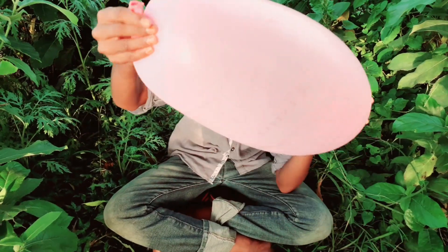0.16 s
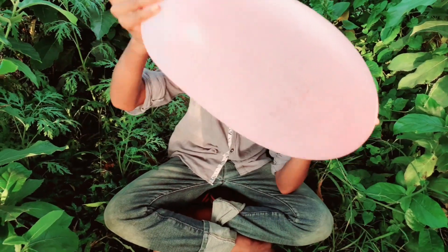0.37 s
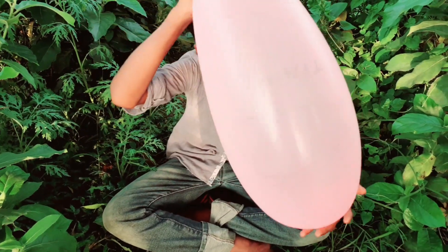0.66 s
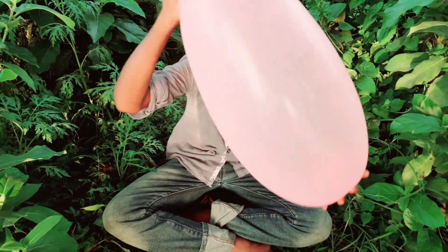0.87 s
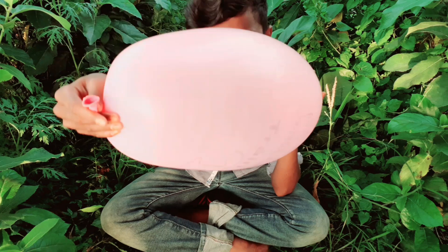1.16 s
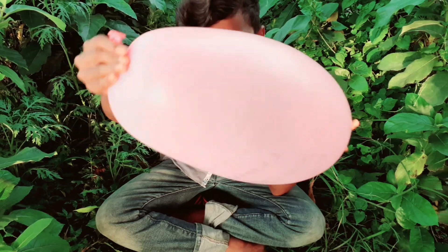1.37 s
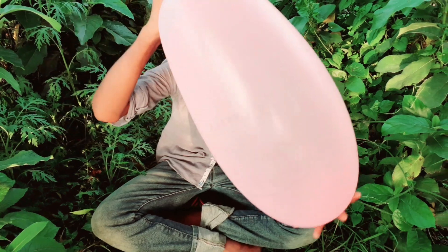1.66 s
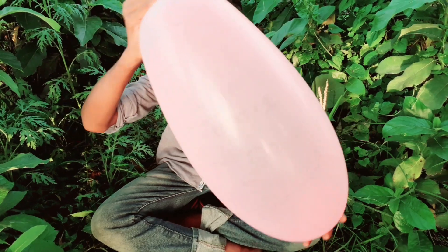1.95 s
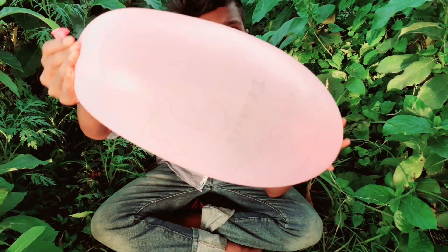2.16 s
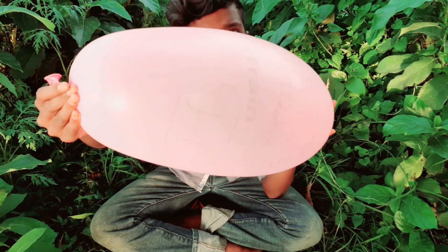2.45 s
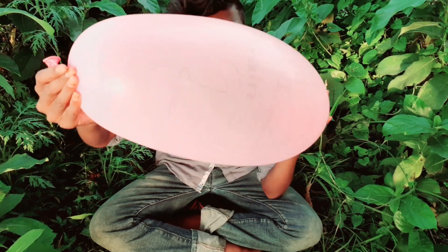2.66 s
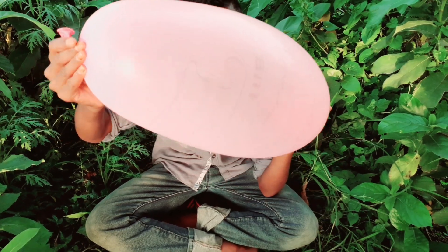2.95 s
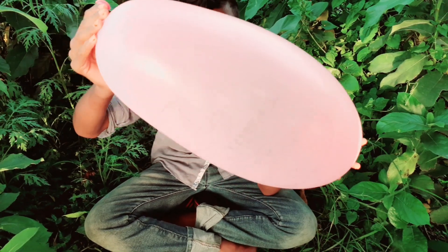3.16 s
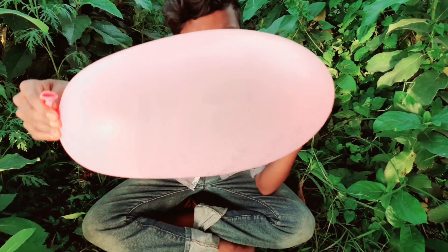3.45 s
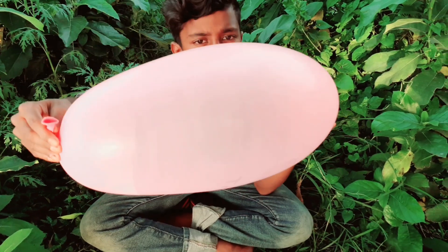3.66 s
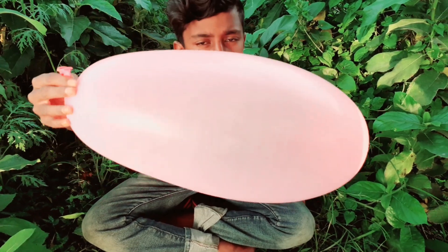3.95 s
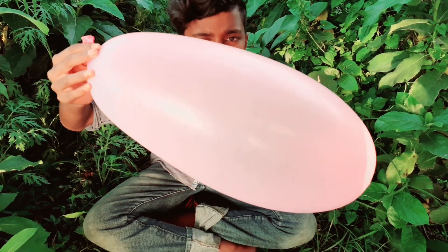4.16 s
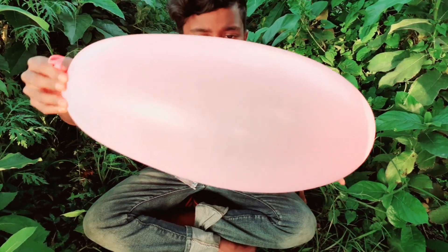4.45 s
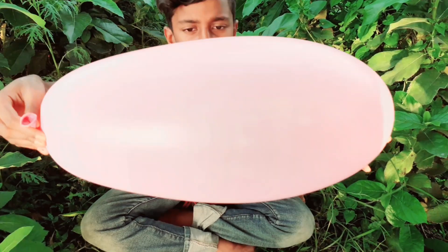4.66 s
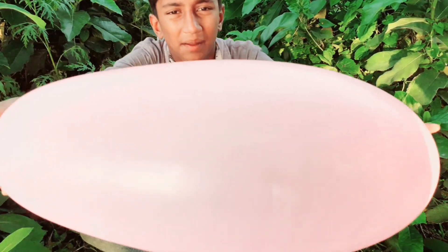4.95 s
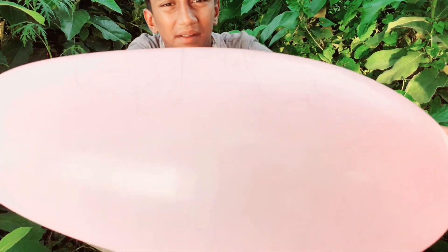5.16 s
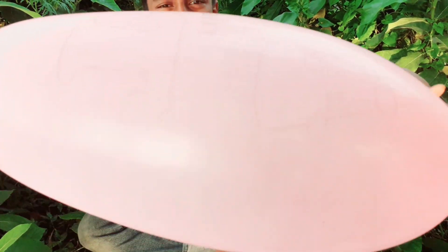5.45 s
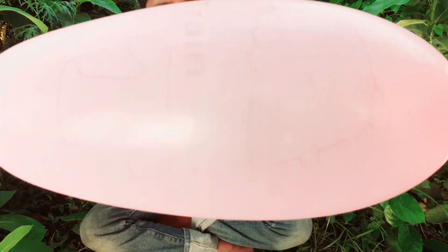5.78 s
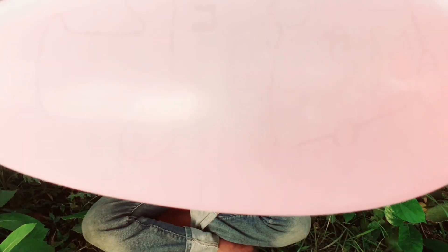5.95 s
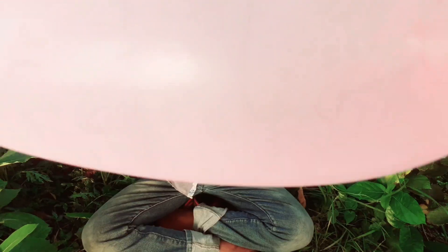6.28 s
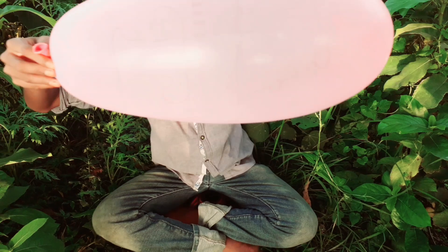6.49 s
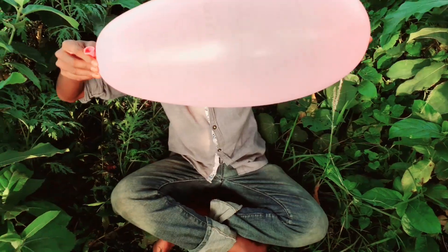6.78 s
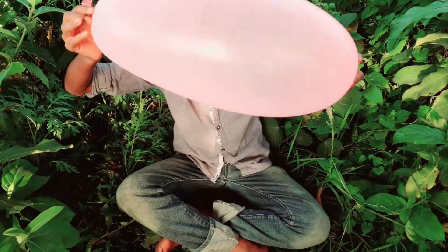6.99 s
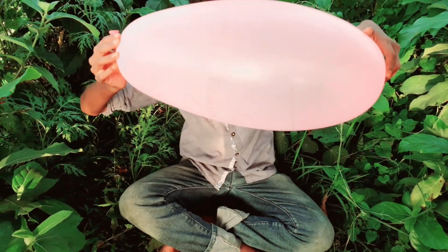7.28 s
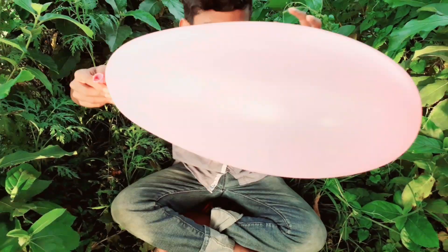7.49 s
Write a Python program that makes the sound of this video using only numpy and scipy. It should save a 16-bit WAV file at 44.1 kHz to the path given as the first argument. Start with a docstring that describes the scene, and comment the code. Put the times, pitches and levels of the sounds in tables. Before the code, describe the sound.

Hands rub and squeeze a big latex balloon up close, squeaky rasping strokes with hollow thuds growing softer while a bird chirps in a leafy garden.

```python
"""Rubbing a balloon in a garden

Two hands rub and squeeze a long latex balloon in a leafy garden, close to a small stereo microphone.
The skin sticks and slips: each slip shakes the resonances of the rubber and of the enclosed air.
Filtered noise makes leaves hiss and puffs of wind buffet the two ports (microphone openings).
Gliding sines make one bird's repeated two-part chirp and other whistles, with short echoes.
All table levels are relative: filters and mixing come after them."""
import sys
import numpy as np
from scipy import signal
from scipy.fft import rfft, irfft, next_fast_len
from scipy.io import wavfile
from scipy.ndimage import map_coordinates

SR = 44100
rng = np.random.default_rng(int(sys.argv[2]) if len(sys.argv) > 2 else 0)


def master(y):
    """Save y as 16-bit WAV."""
    cut = np.clip(np.atleast_2d(y).T, -1, 1)
    pcm = np.round(cut * 32767)  # scale
    wavfile.write(sys.argv[1], SR, pcm.astype(np.int16))


N = 336042  # length [samples]


def amp(db):
    """Turn decibels into a gain."""
    return 10 ** (np.asarray(db) / 20)


def unit(x):
    """Scale a sound to an rms of 1."""
    return x / np.sqrt(np.mean(x ** 2) + 1e-20)


def ramp(x):
    """Keep x where it is positive, else 0."""
    return np.maximum(x, 0)


def along(points, hz):
    """Read a (frequency, value) table between its points, on a log frequency axis."""
    f, value = np.transpose(points)
    return np.interp(np.log(hz + 1), np.log(f + 1), value)


def curves(rows, t=None):
    """Join the rows into one smooth line of samples for each column after the time."""
    times, *columns = np.transpose(rows)
    if t is None:
        t = np.arange(N) / SR
    return [np.interp(t, times, column) for column in columns]


def wobble(rate):
    """Draw a smooth random curve with this many random knots a second."""
    knots = rng.standard_normal(int(N * rate / SR) + 4)
    return map_coordinates(knots, [np.arange(N) * rate / SR])


def apart(share):
    """Make noise common to both ports, plus a share that each port hears alone."""
    return rng.standard_normal(N) + share * rng.standard_normal((2, N))


def filtered(x, response):
    """Multiply the spectrum of x by a response to frequency."""
    size = next_fast_len(N + SR // 2)
    hz = np.fft.rfftfreq(size, 1 / SR)
    return irfft(rfft(x, size) * response(hz), size)[..., :N]


def modes(table, wider=1, sign=-1):
    """Sum resonances (frequency, width, level); with sign 1 they all start together."""
    def response(hz):
        total = 0
        for k, (center, width, db) in enumerate(table):
            damping = 1j * hz * width * wider
            total = total + sign ** k * amp(db) * damping / (center * center - hz * hz + damping)
        return total
    return response


def dull(corner_hz):
    """Let rubber damp the top of its ring."""
    return lambda hz: 1 / (1 + 1j * hz / corner_hz) ** 2


def treble(hz):
    """Pass the fine dry rustle of the surface and weaken what lies below it."""
    ratio = (hz / 7000) ** 2
    return ratio / (1 + ratio)


def placed(times, db):
    """Put one pulse at each time."""
    return np.bincount(np.round(times * SR).astype(int), amp(db), N)


def dying(pulses, t60):
    """Make each pulse jump up and die away by 60 dB in t60 seconds."""
    return signal.lfilter([1], [1, -amp(-60 / (t60 * SR))], pulses)


def tone(rows, waver):
    """Sing a sine along (time, pitch, level) rows, silent outside them; its pitch wavers quickly."""
    hz, db = curves(rows)
    t = np.arange(N) / SR
    phase = 2 * np.pi * np.cumsum(hz * (1 + waver * wobble(150))) / SR
    inside = (t > rows[0][0]) * (t < rows[-1][0])
    return amp(db) * np.sin(phase) * inside


def layered(db, rest_db):
    """Add the powers of overlapping events to a resting level: a row per event, a column per ms."""
    total_db = 10 * np.log10(np.sum(amp(db) ** 2, axis=0) + amp(rest_db) ** 2)
    return np.interp(np.arange(N) * 1000 / SR, np.arange(len(total_db)), total_db)


# Tone colour of the leaves: (frequency [Hz], level [dB])
LEAF_COLOUR = [(180, -14.5), (300, 5.5), (582, -14.5), (800, -9), (3270, -14.5), (5560, -10.5),
               (8140, -19.5), (12700, -22), (15800, -21)]


def leaves():
    """Leaves hiss: coloured noise, different at each port, gently swells and fades."""
    hiss = unit(filtered(rng.standard_normal((2, N)), lambda hz: amp(along(LEAF_COLOUR, hz))))
    return amp(-56.0 + 1.72 * wobble(2.034)) * hiss


# Puffs of air: (start [s], length [s], left port level [dB], right port above the left [dB])
GUST_TIMES = [(1.033, 0.18, -36.5, -0.5), (1.555, 0.29, -42.5, 5), (2.652, 0.1898, -36, -12.5),
              (2.896, 0.098, -41.5, -16), (3.404, 0.149, -43.0, -10), (3.656, 0.12, -34.5, -22),
              (3.832, 0.182, -30.5, -19), (5.117, 0.0955, -39, -7.5), (5.625, 0.0449, -36, -6.5),
              (5.749, 0.017, -32, -33.5), (5.858, 0.287, -34, -13.5), (6.217, 0.2173, -38, -8),
              (6.427, 0.0803, -30.5, -22), (6.61, 0.13, -28.5, -13), (6.933, 0.2827, -42, -10),
              (7.252, 0.179, -41.5, -16), (7.509, 0.14, -34, -21)]
# Tone colour of the buffeting: (frequency [Hz], level [dB])
RUMBLE_COLOUR = [(18, -59.5), (36, -3.5), (97, 6), (274, -15), (420, -23.5), (500, -55.5), (650, -50.5),
                 (1100, -120)]
GUST_EDGE_DB_PER_S = 378.5  # rise and fall of a puff
CALM_LEFT_DB, CALM_RIGHT_DB = -52, -51  # between puffs


def wind():
    """Wind buffets the ports as lumpy low noise; harder gusts add more of a higher flap."""
    t = np.arange(0, N / SR + .001, .001)
    start, length, left_db, right_db = np.transpose(GUST_TIMES)[..., None]
    outside = ramp(start - t) + ramp(t - start - length)
    gust_db = left_db - GUST_EDGE_DB_PER_S * outside
    db = np.array([layered(gust_db, CALM_LEFT_DB), layered(gust_db + right_db, CALM_RIGHT_DB)])
    left_noise, other_noise, flap_noise = rng.standard_normal((3, N))
    right_noise = 0.69 * other_noise + 0.633 * left_noise  # partly shared
    lumps = amp(1.76 * np.array([wobble(15), wobble(26.0)]))
    rumble = filtered(lumps * np.array([left_noise, right_noise]), lambda hz: amp(along(RUMBLE_COLOUR, hz)))
    flap = unit(filtered(lumps[0] * flap_noise, modes([(248.7, 27.5, 0)])))
    flap_gain = amp(0.567 * (db + 29.5) - 16.5)
    return amp(db) * (unit(rumble) + flap_gain * flap) + pops()


AIR_LAG_S = .002  # the thud in the air follows the snap of the skin


def balloon():
    """Fingers stick and slip on the skin, slipping faster in harder strokes, and shake skin and air."""
    rasp_db, boom_db, squeal_db = strokes()
    slips_per_s = np.clip(70 * amp(.7 * (squeal_db + 55)), 70, 260)  # before random scatter
    pulses = slips(slips_per_s, scatter_db=3, size_db=2)
    thuds, snaps = strong_slips()
    creak_thuds, creak_snaps, hush_db = creak()
    thuds, snaps = thuds + creak_thuds, snaps + creak_snaps
    rub = shaking(pulses, 0.025) + 0.55  # sliding adds a steady scrape
    rub = rub * amp(1.048 * wobble(60))  # the grip stutters
    taut = taut_skin(rub, pulses, snaps, squeal_db, hush_db)
    slack = slack_skin(rub, pulses, snaps, rasp_db + hush_db)
    return taut + slack + enclosed_air(pulses, thuds, boom_db) + hum()


# Hand strokes: (skin starts to slip [s], swell length [s], sag length [s], rasp of the slack skin [dB],
# boom of the air above the rasp [dB], squeal of the taut skin above the rasp [dB])
STROKE_TIMES = [(0.035, 0.175, 0.055, -30.0, 5, -3.0), (0.445, 0.12, 0.1863, -30.5, 2, -3.5),
                (0.82, 0.01068, 0.01439, -38.0, 3, -6.0), (0.944, 0.065, 0.08, -34.0, 3.5, -3.0),
                (1.09, 0.0303, 0.1041, -32.0, 9.5, -6.0), (1.32, 0.09, 0.00927, -42.0, 6.5, -8.0),
                (1.455, 0.0706, 0.0031, -45.5, 0.9, -4.0), (1.565, 0.155, 0.145, -30, 4.5, -2.0),
                (1.98, 0.02552, 0.07, -44.0, 12, -6.5), (2.08, 0.0855, 0.1442, -34.5, 7, -5),
                (2.705, 0.03, 0.02438, -39, 5.0, -5.0), (2.782, 0.0028, 0.1698, -53.5, 10.5, -3.5),
                (3.145, 0.02475, 0.025, -39.5, 1.5, -2.0), (3.211, 0.002924, 0.0239, -49.5, 11.5, -7.5),
                (3.286, 0.00322, 0.04086, -46.5, 11, -6.5), (3.4, 0.00338, 0.2392, -44, 1, -6.0),
                (3.647, 0.1925, 0.1574, -41.0, 3.5, -9.5), (4.083, 0.0291, 0.03367, -41.5, 5, -8.5),
                (4.187, 0.002734, 0.087, -45.5, 5, -10), (4.429, 0.003, 0.012, -50, 5.6, -8),
                (4.593, 0.0697, 0.002973, -44.0, 7, -7.5), (5.02, 0.1103, 0.14, -47.0, 11.5, -5.5),
                (5.42, 0.019, 0.00737, -49.0, 5, 0), (5.5, 0.01208, 0.04, -53, 7.5, 0),
                (5.711, 0.00279, 0.2206, -50.5, 3, -6.5), (5.936, 0.03226, 0.00297, -52.0, 6.5, -3.5),
                (6.013, 0.02, 0.065, -44.0, 3, -2), (6.325, 0.022, 0.015, -46.0, 3, -1.0),
                (7.0, 0.0563, 0.0579, -45, 3, -7.5), (7.16, 0.01302, 0.012, -45.0, 7, -6.0),
                (7.232, 0.01833, 0.0706, -51, 2.5, -2), (7.369, 0.0147, 0.0344, -48.5, -1.5, -0.5)]
# Hands only holding: (rasp [dB], boom [dB], squeal [dB])
HOLDING_LEVELS = (-74, -57.5, -76)
ATTACK_DB_PER_S, RELEASE_DB_PER_S = 800, 480  # the skin bites, then lets go
SWELL_DB_PER_S, SAG_DB_PER_S = 60, 58
BOOM_FOLLOWS = 0.772  # the air swings less widely than the skin [dB per dB]


def strokes():
    """Set the levels of rasp, boom and squeal: each stroke bites, swells, sags and lets go."""
    t = np.arange(0, N / SR + .001, .001)
    start, swell, sag, rasp_db, boom_db, squeal_db = np.transpose(STROKE_TIMES)[..., None]
    hardest = start + swell
    end = start + swell + sag
    held = np.clip(t, start, end)
    drop_db = ATTACK_DB_PER_S * ramp(start - t) + SWELL_DB_PER_S * ramp(hardest - held)
    drop_db = drop_db + SAG_DB_PER_S * ramp(held - hardest) + RELEASE_DB_PER_S * ramp(t - end)
    rasp = rasp_db - drop_db
    boom = rasp_db + boom_db - BOOM_FOLLOWS * drop_db
    squeal = rasp_db + squeal_db - drop_db
    return [layered(db, rest_db) for db, rest_db in zip((rasp, boom, squeal), HOLDING_LEVELS)]


def slips(rate, scatter_db, size_db):
    """Make uneven slip pulses whose average power stays even when they come faster."""
    turns = np.cumsum(rate * amp(scatter_db * wobble(60)) / SR)
    hit = np.diff(np.floor(turns), prepend=0) > 0  # one slip per whole turn
    size = amp(size_db * rng.standard_normal(N)) / np.sqrt(rate)
    return unit(hit * size)


def shaking(pulses, t60):
    """Follow the strength of the shaking that the pulses leave; their powers add."""
    return unit(np.sqrt(dying(pulses ** 2, t60 / 2)))


def shifting(shake, share, pulses, table, swing_db):
    """Shake each mode on its own, more or less strongly, as the hand moves over the skin."""
    total = 0
    for k, mode in enumerate(table):
        drive = shake * apart(share) + (-1) ** k * pulses
        total = total + amp(swing_db * wobble(8)) * filtered(drive, modes([mode]))
    return unit(total)


def blow(snaps, noise):
    """A strong slip is a clean blow with a short noisy tail, softened by the rubber."""
    return filtered(snaps + .15 * dying(snaps, .012) * noise, dull(5000))


# Resonances of the slack skin: (frequency [Hz], width [Hz], level [dB])
SLACK_MODES = [(756.8, 194, -3.5), (1022, 141.3, -2), (1253.8, 94.5, -8.5), (1566.5, 278, -14)]


def slack_skin(rub, pulses, snaps, db):
    """Slack skin rasps at its lower resonances, rubbed by the hand and struck by strong slips."""
    rasp = filtered(shifting(rub, 0.832, pulses, SLACK_MODES, swing_db=2.5), dull(6300))
    struck = filtered(blow(snaps, apart(1.0)), modes(SLACK_MODES))
    return amp(db) * rasp + amp(35) * struck


# Resonances of the taut skin: (frequency [Hz], width [Hz], level [dB])
TAUT_MODES = [(1768, 481, 2.5), (2451, 345, 1), (3278, 728, -2), (4630, 360, -19.5), (5920, 620, -12.5)]
# The taut end is nearer the left port: (time [s], lead of the left port [ms])
LEFT_LEAD = [(2.4, 0.7155), (2.8, 0.1466)]
RUSTLE_LAGS = 0.394  # the fine rustle grows less than the squeal [dB lost per dB]


def taut_skin(rub, pulses, snaps, squeal_db, hush_db):
    """Taut skin squeals at its higher resonances, rustles and ticks, and reaches the right port later."""
    noise = apart(1.984)
    squeal = filtered(shifting(rub, 2.09, pulses, TAUT_MODES, swing_db=2.8), dull(5820))
    rustle_gain = amp(-21 - RUSTLE_LAGS * (squeal_db + 44))
    squeal = squeal + rustle_gain * unit(filtered(rub * noise, treble))
    struck = filtered(blow(snaps, noise), modes(TAUT_MODES))
    left, right = amp(squeal_db + hush_db + 5.5) * squeal + amp(19.5) * struck + ticks(noise)
    lead_ms = curves(LEFT_LEAD)[0]
    late = map_coordinates(right, [np.arange(N) - lead_ms * SR / 1000])
    return np.array([left, late])


# Resonances of the enclosed air: (frequency [Hz], width [Hz], level [dB])
AIR_MODES = [(122.7, 22, -8.5), (245.94, 66, -5.5), (329.8, 62.6, 0.5), (389.4, 66.5, -2),
             (457.8, 81.5, -9)]
PRESSED = 1.8  # the finger that slipped widens the air modes of its thud by this factor


def enclosed_air(pulses, thuds, boom_db):
    """The air booms and thuds, radiates from the whole body and reaches both ports together."""
    push = (shaking(pulses, 0.0667) + 0.438) * apart(0.397) + 1.08 * pulses
    boom = amp(boom_db + 1.0) * unit(filtered(push, modes(AIR_MODES)))
    thud = filtered(filtered(thuds, modes(AIR_MODES, PRESSED, sign=1)), dull(600))
    return filtered(boom + amp(30) * thud, dull(5100))


# Single strong slips: (time [s], thud in the air level [dB], snap of the skin level [dB])
STRONG_SLIPS = [(0.446, -46, -31), (0.935, -20.5, -38.5), (0.959, -15.5, -33), (1.096, -12, -29),
                (1.117, -12, -26), (1.167, -19, -21.5), (1.564, -26.5, -32), (1.608, -7, -19),
                (2.186, -10, -26.5), (2.285, -24.5, -47.5), (3.292, -22, -57.5), (3.654, -24.5, -39),
                (3.705, -39, -35.5), (4.03, -21, -34.5), (4.059, -22.5, -30.5), (4.113, -32, -34.5),
                (4.651, -29.5, -31.5), (4.754, -29.5, -40), (5.04, -18.5, -36.5), (5.112, -21.5, -41),
                (5.144, -23, -47), (5.166, -16.5, -44), (5.183, -24.5, -41), (5.287, -24, -50.5),
                (5.463, -27, -35), (5.512, -26.5, -37), (6.013, -33, -29), (7.052, -26, -33.5),
                (7.075, -20, -33.5), (7.124, -34.5, -36)]


def strong_slips():
    """Each strong slip gives a snap pulse for the skin and a slightly later thud pulse for the air."""
    times, thud_db, snap_db = np.transpose(STRONG_SLIPS)
    return placed(times + AIR_LAG_S, thud_db), placed(times, snap_db)


# Modes of the air or skin that hum for a moment, a list for each: (time [s], pitch [Hz], level [dB])
HUM_NOTES = [
    [(.48, 124.6, -64.5), (.57, 131.6, -31), (.72, 128.4, -34.5), (.83, 126.1, -45)],
    [(3.38, 401.2, -64), (3.405, 397.7, -31), (3.45, 375.8, -33.5), (3.5, 401, -46)],
    [(7.365, 2747, -59.5), (7.41, 2700, -43.5), (7.427, 2530, -54.5)],
]


def hum():
    """Single modes hum briefly as sines of unsteady pitch."""
    return sum(tone(rows, waver=0.0431) for rows in HUM_NOTES)


# Dry treble ticks: (time [s], level [dB])
TICK_TIMES = [(0.9595, -33), (1.1017, -35), (1.503, -34), (1.75, -36), (1.856, -34), (2.16, -37),
              (3.2863, -32), (5.4635, -33)]


def ticks(noise):
    """Short dying bursts of noise, kept to the treble, make dry ticks."""
    bursts = dying(placed(*np.transpose(TICK_TIMES)), 0.01) * noise
    return amp(-10) * filtered(bursts, lambda hz: treble(2 * hz))


def birds():
    """Birds whistle as sines, heard directly at both ports (1 dB louder at the right), with short echoes from
    the trees at both."""
    song = chirps() + whistles()
    fade = amp(-60 * np.arange(SR // 4) / SR / 0.213)  # 60 dB down in 0.213 s
    trees = rng.standard_normal((2, SR // 4)) * fade
    trees = trees / np.linalg.norm(trees[0])
    echo = signal.fftconvolve(song[None], trees, axes=1)[:, :N]
    return song * amp([[0], [1]]) * 1.0 + amp(1.0) * echo


# The repeated chirp: (time [s], level [dB], extra level of the fundamental [dB])
CHIRP_TIMES = [(2.386, -57.5, 5), (2.653, -49.5, -5.5), (2.888, -52, -4), (3.113, -57, 1),
               (3.362, -49, -3.5), (3.635, -50, -8), (3.867, -46.5, -7.5), (4.089, -47.5, -6.5),
               (4.322, -53, -2.5), (4.584, -55, -8.5), (5.04, -55.5, -6), (5.257, -52.5, -1.5),
               (5.476, -46.5, -8), (5.708, -46, -9), (5.944, -47, -4), (6.183, -48, -7), (6.478, -52.5, 3),
               (6.84, -55.5, 1.5), (7.156, -46.5, -1), (7.461, -49.5, 1.5)]
# Its shape: (time from the middle of the first part [s], pitch [Hz], fundamental level [dB],
# octave level [dB])
CHIRP_SHAPE = [(-.016, 1977, -47.5, -34), (-.008, 2065, -21.5, -5), (.004, 2297, -2.5, -2.5),
               (.011, 2251, -20, -6), (.015, 3114, -1, -7.5), (.019, 3500, 4, -38.5),
               (.027, 2893, -2.5, -43), (0.037, 2303, -12.5, -38.5)]


def chirps():
    """Each chirp is a gliding sine and its octave, with a slightly different pitch every time."""
    song = np.zeros(N + SR)
    t = np.arange(CHIRP_SHAPE[0][0], CHIRP_SHAPE[-1][0], 1 / SR)
    hz, fundamental_db, octave_db = curves(CHIRP_SHAPE, t)
    for time, db, extra_db in CHIRP_TIMES:
        detune = 1 + 0.0132 * rng.standard_normal() + .02 * wobble(250)[:len(t)]
        phase = 2 * np.pi * np.cumsum(hz * detune) / SR
        chirp = amp(fundamental_db + extra_db) * np.sin(phase) + amp(octave_db) * np.sin(2 * phase)
        first = round((time + t[0]) * SR)
        song[first:][:len(t)] += amp(db - 3) * chirp
    return song[:N]


# Other whistles, a list for each: (time [s], pitch [Hz], level [dB])
WHISTLE_NOTES = [
    [(2.47, 2691, -90.5), (2.485, 2593, -61), (2.54, 2665, -62.5), (2.56, 2541, -91.5)],
    [(6.5, 4665, -69.5), (6.58, 5800, -63), (6.67, 6220, -66.5), (6.76, 5697, -59), (6.83, 4757, -72),
     (6.9, 3863, -75.5)],
    [(7.52, 4165, -61.5), (7.57, 5515, -66.5), (7.62, 6266, -67.5)],
]


def whistles():
    """Each whistle is one gliding sine; the first wavers least in pitch."""
    return sum(tone(rows, waver) for rows, waver in zip(WHISTLE_NOTES, (.003, .015, .015)))


# A slow, nearly even run of slips: (start [s], how many, spacing [s], thud level [dB], snap level [dB])
CREAK_RUN = (3.737, 7, .017, -31, -34)


def creak():
    """A run of slips creaks; while the finger creaks, rasp and squeal are hushed."""
    start, count, spacing, thud_db, snap_db = CREAK_RUN
    times = start + spacing * np.arange(count) + .001 * rng.standard_normal(count)
    thuds = placed(times + AIR_LAG_S, thud_db + rng.standard_normal(count))
    snaps = placed(times, snap_db + rng.standard_normal(count))
    last = times[-1]
    hush_db = curves([(start - .06, 0), (start - .04, -9), (last - .03, -9), (last, 0)])[0]
    return thuds, snaps, hush_db


# Sudden pops of air: (time [s], left port peak level [dB])
POP_TIMES = [(5.752, -39), (6.491, -25), (6.672, -21.5), (7.511, -22.5), (7.528, -27)]


def pops():
    """Each pop is one soft low push that rings out in a few cycles, much weaker at the right port."""
    t = np.arange(SR // 20) / SR
    soft_start = (1 - np.exp(-t / 0.00157)) ** 2
    push = np.sin(2 * np.pi * 190 * t) * amp(-60 * t / 0.0256) * soft_start
    popping = signal.fftconvolve(placed(*np.transpose(POP_TIMES)), push / push.max())[:N]
    return popping * amp([[0], [-16]])


# The two ports differ in colour: (frequency [Hz], left minus right [dB])
PORT_COLOUR = [(60, -18.5), (150, 0.5), (380, -3), (950, -3.5), (6500, -4), (9000, 10.5), (15000, 7)]


def scene():
    """Sound in the air takes each port's colour; wind acts on the ports directly."""
    sounds = leaves() + balloon() + birds()
    return filtered(sounds, lambda hz: amp(np.outer([.5, -.5], along(PORT_COLOUR, hz)))) + wind()


TOP_HZ = 15830  # band limit


def record(dry):
    """The microphone loses the deepest bass, and nothing is kept above the band limit."""
    return filtered(dry, lambda hz: (1j * hz / (45 + 1j * hz)) ** 2 * (hz < TOP_HZ))


dry = scene()
out = record(dry)
master(out)
```